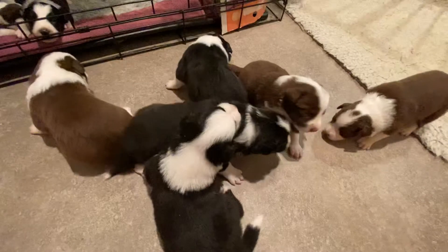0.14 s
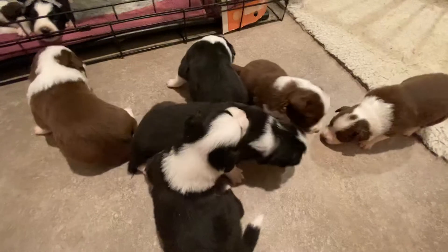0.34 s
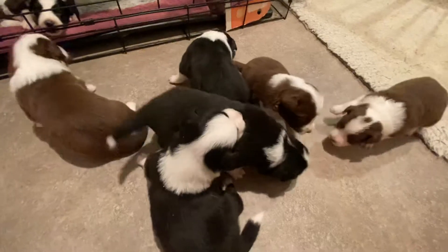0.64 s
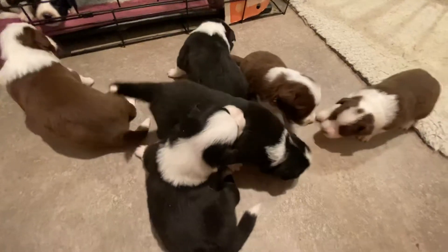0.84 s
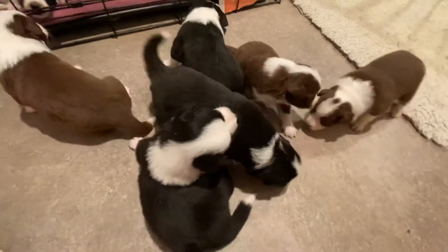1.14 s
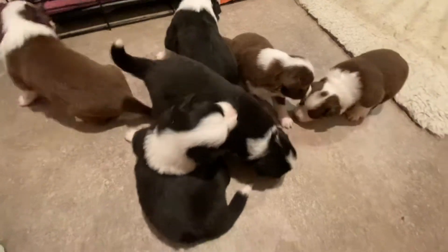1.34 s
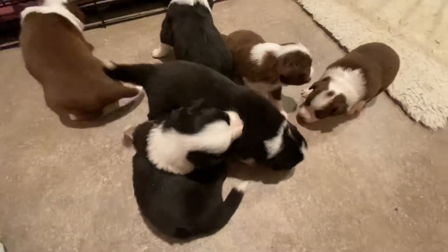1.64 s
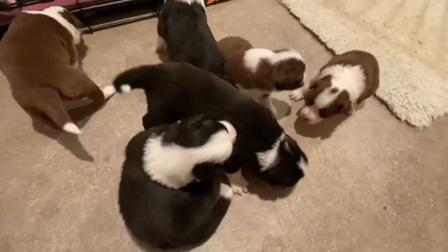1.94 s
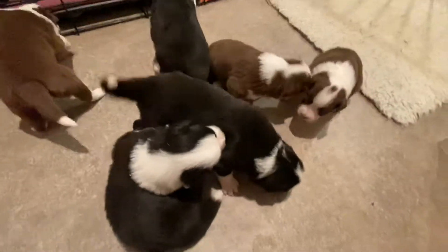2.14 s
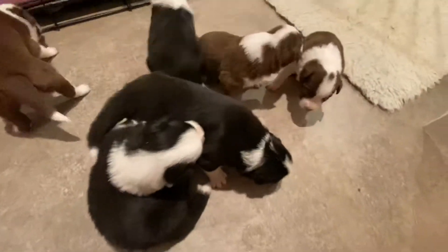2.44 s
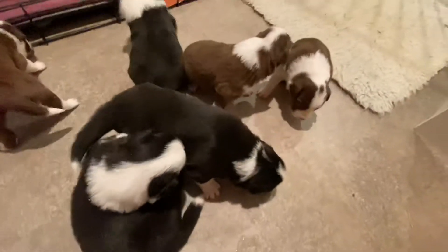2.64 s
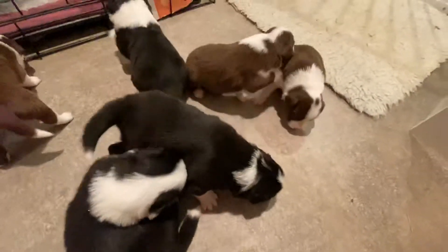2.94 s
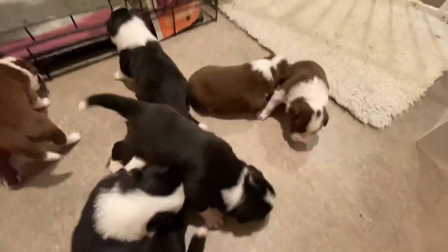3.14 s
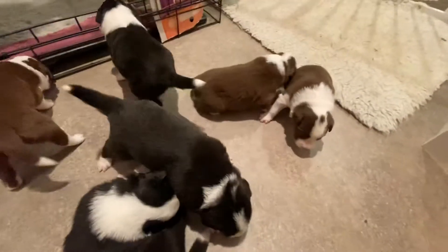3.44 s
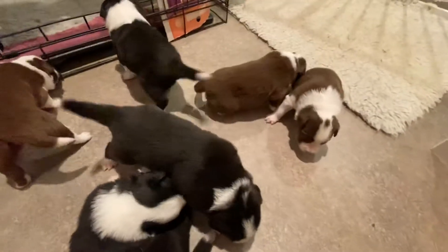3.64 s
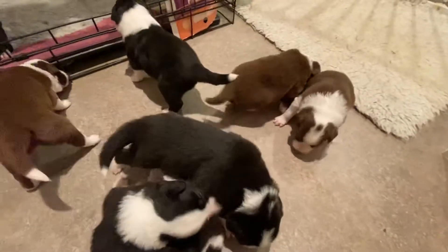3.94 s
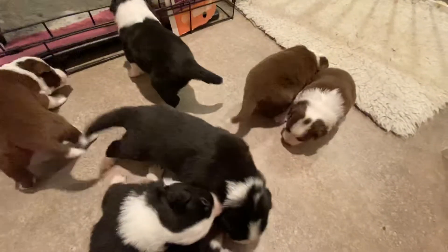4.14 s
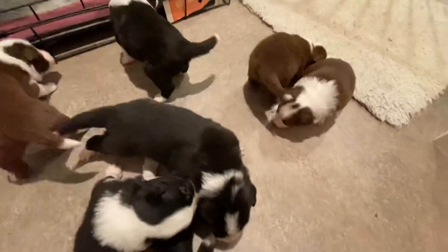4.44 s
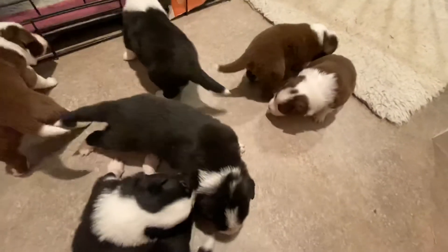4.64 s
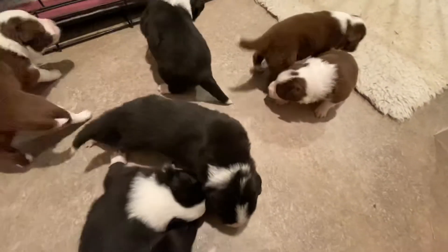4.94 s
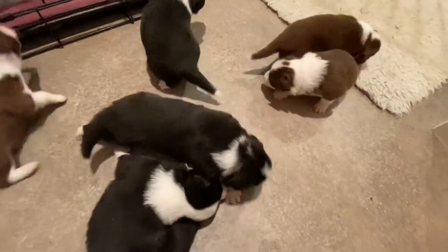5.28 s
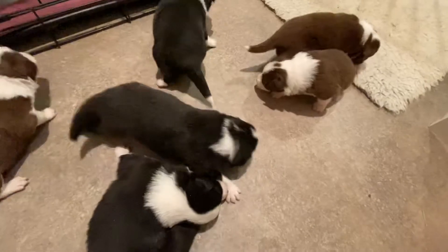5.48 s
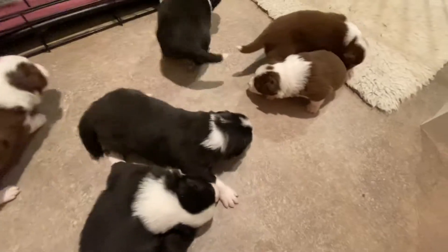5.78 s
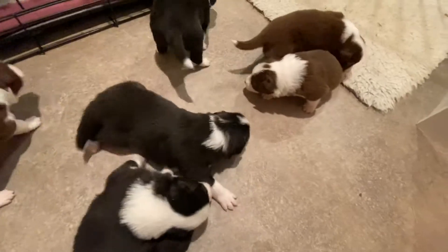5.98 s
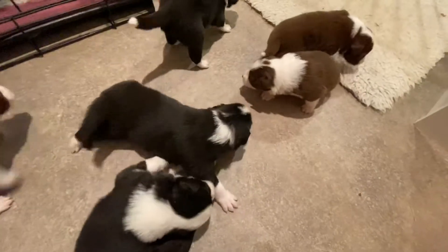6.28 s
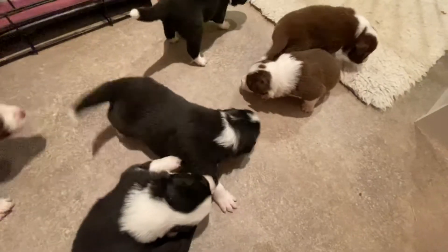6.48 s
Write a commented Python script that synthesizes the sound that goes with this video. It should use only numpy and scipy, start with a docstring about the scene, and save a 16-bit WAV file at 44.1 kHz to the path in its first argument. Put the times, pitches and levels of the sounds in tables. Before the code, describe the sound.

A handheld stereo microphone close to a litter of newborn-like puppies indoors. Padded paws bump and boom lightly, nails click, and coats brush in grainy rustles. Nasal little grunts pop up now and then, a thin whimper answers from the left after a second, then a quieter middle. The last stretch grows busier with whining, rough breath, quick grunts and two loud, piercing yelps, over short room reflections and faint rumble.

```python
"""Very young puppies scuffle on a carpet in a small room, close to a handheld stereo microphone.
From the start paws thud and pat on a booming floor, claws tick and fur brushes over the pile as grainy noise.
The near ones soon grunt: jittery pulses of the vocal folds ring throat, nose and mouth. After a second
one farther to the left whimpers thinly, and again near the end with hoarse breath along the late whimpers.
Two yelps break into shrieks last. Room echo, a low rumble and faint hiss lie under it all."""
import sys
import numpy as np
from scipy import signal
from scipy.fft import rfft, irfft
from scipy.io import wavfile
from scipy.ndimage import uniform_filter1d

SR = 44100
rng = np.random.default_rng(int(sys.argv[2]) if len(sys.argv) > 2 else 0)


def master(y):
    """Save y as 16-bit WAV."""
    cut = np.clip(np.atleast_2d(y).T, -1, 1)
    pcm = np.round(cut * 32767)  # scale
    wavfile.write(sys.argv[1], SR, pcm.astype(np.int16))


N = 291589  # length in samples
EDGE_HZ = 15900  # top of the recorder's band

# Paws landing with the body's weight and dragging on.
# Each row: time in seconds, thud peak in dB, drag level in dB before the scuffing is trimmed.
FOOTFALLS = [(.032, -49.5, -72), (.439, -45, -71), (.828, -49, -72), (.992, -46, -74), (1.276, -42, -67),
             (1.405, -49, -79), (1.555, -46.5, -66), (1.702, -41.5, -70), (1.802, -39, -79),
             (2.064, -46, -69), (2.328, -33.5, -77), (2.395, -39, -73), (2.717, -42.5, -73),
             (3.031, -34, -61), (3.338, -36, -80), (3.447, -47, -83), (3.551, -48, -85),
             (4.199, -46.5, -84), (4.39, -41, -79), (5.166, -45, -77), (5.239, -45, -67), (5.477, -45, -75),
             (5.734, -44, -62), (5.813, -40.5, -70), (6.322, -47, -61), (6.493, -34, -64)]
# Colour of a claw tick. Each row: frequency in Hz, gain in dB.
CLAW_COLOUR = [(400, -8), (1500, -12), (3500, -3.5), (7000, -6), (11000, 0.5), (15500, -8)]
# The litter's steady rustling, the base for rubbing and small ticks. Each row: time in seconds, level in dB.
RUSTLING = [(0.0, -83), (0.4, -77), (0.61, -88), (1.16, -76), (1.42, -82), (2.03, -75), (2.61, -86),
            (2.85, -80), (3.68, -88), (4.2, -82), (4.97, -82), (5.13, -76), (6.31, -71), (6.61, -74)]


def gain_of(db):
    """Decibels to amplitude."""
    return 10 ** (np.asarray(db) / 20)


def evened(x):
    """Scales to an rms of 1."""
    return x / np.sqrt(np.mean(x ** 2) + 1e-20)


def read(points, hz):
    """Reads a table on a log-frequency axis."""
    f, value = np.transpose(points)
    return np.interp(np.log(hz + 1), np.log(f + 1), value)


def bins(x):
    """The frequencies of the spectrum of x."""
    return np.fft.rfftfreq(x.shape[-1], 1 / SR)


def colour(x, db):
    """Filters x by a gain for each frequency."""
    return irfft(rfft(x) * gain_of(db), x.shape[-1])


def shelf(hz, corner_hz):
    """Rises smoothly from 0 to 1 around the corner."""
    return 1 - 1 / (1 + (hz / corner_hz) ** 6)


def resonance(hz, centre_hz, width_hz):
    """A bell of height 1 around the centre."""
    return 1 / (1 + ((hz - centre_hz) / width_hz) ** 2)


def wander(count, rate_hz):
    """Slow random drift of rms about 1: noise cut off above twice the rate."""
    x = rng.standard_normal(count + SR // 2)
    return evened(colour(x, -100 * shelf(bins(x), 2 * rate_hz)))[:count]


def panned(x, pan_db):
    """Leans a sound to the left (positive) or right."""
    return x * gain_of(np.array([[pan_db], [-pan_db]]) / 2)


def add(mix, s, sound):
    """Mixes a sound in at time s."""
    part = mix[:, max(round(s * SR), 0):][:, :sound.shape[-1]]
    part += sound[..., :part.shape[1]]


def noise_pair(count, envelope=1):
    """Noise for left and right, alike in the bass and mostly unrelated in the treble."""
    # Each row: frequency in Hz, left-right correlation.
    likeness = [(60, 0.93), (150, 0.34), (300, 0.75), (700, 0.26), (2000, 0.085), (5000, .1), (8500, 0.38),
                (13000, 0.25)]
    a, b = rfft(rng.standard_normal((2, count)) * envelope)
    same = np.clip(read(likeness, np.fft.rfftfreq(count, 1 / SR)), -1, 1)
    return irfft(np.array([a, same * a + np.sqrt(1 - same ** 2) * b]), count)


def grunt(start, attack, hold, release, db, swell_db, top_hz, crest, rough):
    """Effort swells, holds and lets go; the slack folds then drop in pitch and rattle."""
    rise_hz_per_s, sag_hz_per_s, droop_db_per_s = 1100, 700, 85  # it sags as the air is spent
    release_db = -20  # how far it fades over its release
    slack_s, slack_drop, slack_rough = .018, .22, .6  # how fast, share of pitch lost, roughness gained
    t = np.linspace(0, attack + hold + release, num=200)
    slack = 1 - np.exp(-np.maximum(t - attack - hold, 0) / slack_s)
    pushed = np.minimum(t, attack + hold)
    pitch = top_hz - np.maximum(rise_hz_per_s * (crest - pushed), sag_hz_per_s * (pushed - crest))
    droop_db = -droop_db_per_s * hold
    corners = np.cumsum([0, attack, hold, release])
    level = db + np.interp(t, corners, [-swell_db, 0, droop_db, droop_db + release_db])
    return start + t, pitch * (1 - slack_drop * slack), level, rough + slack_rough * slack


def yelp(start, break_s, length, first_hz, db, rough):
    """A rising cry breaks upward into a shriek, loudest at the top pitch; gives the two parts."""
    glide_hz_per_s, leap_hz, leap_s = 2500, 175, .004  # glide up, then break into a higher register
    crest_s, fall_hz_per_s, db_per_hz = .057, 4500, .055
    t = np.arange(0, length, .0005)
    broken = .5 + .5 * np.tanh((t - break_s - leap_s) / leap_s)
    pitch = first_hz + glide_hz_per_s * np.minimum(t, crest_s) + leap_hz * broken
    pitch -= fall_hz_per_s * np.maximum(t - crest_s, 0)
    level = db - db_per_hz * (pitch.max() - pitch)
    course = np.array([start + t, pitch, level, rough + 0 * t])
    return course[:, t < break_s], course[:, t >= break_s]


def whimper(start, length, crest, top_hz, fall_hz, db, rough):
    """A thin tone fades in, arches over its top and falls away, wavering."""
    attack_s, onset_db, waver, waver_hz = .016, -12, .012, 40  # waver is a share of the pitch
    t = np.arange(0, length, 1 / SR)
    arch = top_hz - fall_hz * ((t - crest) / (length - crest)) ** 2
    pitch = arch * (1 + waver * wander(len(t), waver_hz))
    level = db + onset_db * np.maximum(1 - t / attack_s, 0)
    return start + t, pitch, level, rough + 0 * t


def vocal_folds(turns, top_hz, rough, spread=.55, shimmer=.76, uneven=.35):
    """Pulses summed from harmonics; strained folds beat unevenly, strong and weak in turn."""
    # the partials lag one another, so each pulse is spread over its cycle
    partials = range(1, int(EDGE_HZ / top_hz))
    folds = evened(sum(np.cos(2 * np.pi * k * turns - spread * k * k) for k in partials))
    return folds * (1 + rough * (shimmer * wander(len(turns), 213) + uneven * np.cos(np.pi * turns)))


def call(voice, course, mouth_db=9, mouth_width_hz=130, upper_width_hz=220, jitter=.0075, rough_jitter=.0792,
         air_db=-11, hiss_db=-1, hiss_bass_db=-28, fade_db=-14, airy_hz=2200, attack=.0042, release=.01,
         lowest_hz=170):
    """Jittery pulses of the vocal folds, with a puff of air each cycle, ring the throat, nose and mouth."""
    # A puppy's head and throat. Each row: frequency in Hz, gain in dB.
    throat = [(120, -31.5), (210, -18.5), (280, 1), (420, -5.5), (600, -6.5), (1000, -9), (1230, -19),
              (1680, -18), (2100, -23.5), (2450, -23), (3000, -39.5), (5200, -45.5), (6500, -32.5),
              (8800, -50.5), (10700, -37.5), (15000, -62)]
    # Little in the bass. Each row: frequency in Hz, share of the widening.
    widening_share = [(380, 0.054), (620, 0.8), (850, 0.77), (1200, 0.53), (2000, 0.24)]
    lead_ms, pan_db, mouth_hz, nasal_db, upper_hz, upper_db = voice
    s, *controls = course
    t = np.arange(s[0] - .02, s[-1] + .02, 1 / SR)
    pitch, level, rough = (np.interp(t, s, control) for control in controls)
    pitch = pitch * (1 + (jitter + rough_jitter * rough) * wander(len(t), 138))
    turns = np.cumsum(pitch) / SR
    folds = vocal_folds(turns, pitch.max(), rough)
    puffs = evened((0.53 + np.exp(-(turns % 1) / 0.27)) * rng.standard_normal(len(t)))
    # air takes over from the pulses in the treble
    hz = bins(t)
    airy = shelf(hz, airy_hz)
    voiced = folds + gain_of(air_db) * np.sqrt(abs(rough)) * puffs
    drive = colour(voiced, fade_db * airy) + colour(puffs, hiss_bass_db * (1 - airy) + hiss_db * airy)
    throat_db = read(throat, hz) + nasal_db * (1 - shelf(hz, 530))
    throat_db += mouth_db * resonance(hz, mouth_hz, mouth_width_hz)
    throat_db += upper_db * resonance(hz, upper_hz, upper_width_hz)
    x = colour(drive, throat_db)
    # loudness follows the effort, whichever partial the mouth favours
    window = signal.windows.hann(701)
    x /= np.sqrt(abs(signal.fftconvolve(x ** 2, window / window.sum(), "same")) + 1e-12)
    gate = np.clip(np.minimum((t - s[0]) / attack, (s[-1] - t) / release) + .5, 0, 1)
    x *= gain_of(level) * np.sin(np.pi / 2 * gate) ** 2
    radiated = rfft(x) * shelf(hz, lowest_hz)  # the voice keeps no bass
    # the recorder's stereo widening turns left and right apart, little in the bass
    turn = np.exp(1j * np.pi * hz * lead_ms / 1000 * read(widening_share, hz))
    return t[0], panned(irfft(radiated * np.array([turn, 1 / turn]), len(t)), pan_db)


def near_voices():
    """Grunts and yelps close to the microphone, each driven by its own effort."""
    # Grunts. Each row holds the effort: start, attack, hold and release in seconds, level in dB, swell in dB,
    # top pitch in Hz, time to the top in seconds, roughness; then the voice: left lead in ms before
    # the widening share, left-right in dB, mouth resonance in Hz, nasal gain in dB,
    # upper resonance in Hz, its gain in dB.
    grunt_rows = [ ((.277, .003, .02, .06, -51, 0, 315, 0, .6), (-1, -1, 800, 1, 1500, -12)),
                  ((1.33, .005, .011, .02, -37, 2, 410, 0, .36), (1.3, 1, 683, 10, 1698, -3)),
                  ((1.832, .048, .011, .02, -27.5, 5, 428, .059, .07), (.3, -1.5, 775, 2, 1760, 5)),
                  ((2.654, .014, .014, .025, -37.5, 8, 297, .014, .25), (0, 3.5, 783, 7, 1398, 5)),
                  ((2.892, .04, .072, .09, -28.3, 9, 415, .04, .13), (.1, -2, 780, 4, 1650, 0)),
                  ((4.082, .018, .006, .025, -34.5, 12, 312, .02, .15), (.1, 2, 830, 4.5, 1272, 12)),
                  ((4.322, .07, .004, .036, -35.5, 2, 329, .024, .26), (.2, 0, 880, 4, 1400, 14)),
                  ((4.54, .012, .01, .035, -56, 6, 318, 0, .9), (3, 4.5, 850, 17, 1497, 6.5)),
                  ((4.974, .004, .018, .035, -47.5, 2, 315, 0, .5), (1.5, 2, 850, 17.5, 1500, -14)),
                  ((5.17, .016, .008, .022, -37.5, 9, 311, .014, .3), (.3, .5, 930, 13, 1200, 3)),
                  ((5.376, .016, .012, .03, -38.5, 4, 310, 0, .5), (1.5, .5, 874, 13, 1403, 6)),
                  ((5.577, .017, .018, .025, -40.5, 9, 316, .012, 1.1), (.8, 1.5, 902, 7, 1300, 11)),
                  ((5.635, .03, .06, .04, -50, 2, 335, .02, .8), (1, 2, 850, 18, 1500, 0)),
                  ((5.778, .016, .012, .07, -34.5, 12, 385, .03, .9), (1, 4, 764, .5, 1600, 2)),
                  ((6.128, .053, .014, .04, -31, 18, 305, .068, .3), (.26, 2.5, 824, 1, 1411, 4)),
                  ((6.307, .038, .005, .025, -32.5, 5, 368, .04, .5), (1.15, 2.5, 730, -6, 1400, 2)),
                  ((6.355, .015, .015, .04, -36.5, 3, 422, .025, .3), (1.15, 2.5, 716, 12, 1152, 0)),
                  ((6.454, .02, .024, .02, -39.5, 5, 412, .02, 1.3), (.5, 1.5, 824, 1.5, 1402, 3))]
    # Yelps. Each row: start, time to the break and length in seconds, first pitch in Hz,
    # shriek level in dB, roughness.
    yelp_rows = [(6.009, .025, .09, 610, -19.5, .33), (6.568, .018, .06, 665, -23, .4)]
    # Voices before and after the break: columns as for a grunt's voice.
    cry_voice = (-.4, 0, 1270, -18, 1850, 9)
    shriek_voice = (.45, -.5, 876, -19, 1776, 4.5)
    near = np.zeros((2, N))
    for effort, voice in grunt_rows:
        add(near, *call(voice, grunt(*effort)))
    for row in yelp_rows:
        cry, shriek = yelp(*row)
        add(near, *call(cry_voice, cry))
        add(near, *call(shriek_voice, shriek))
    return near


def far_voice():
    """Thin whimpers of the puppy farther to the left."""
    # Its voice: left lead in ms before the widening share, left-right in dB, mouth resonance in Hz,
    # nasal gain in dB, upper resonance in Hz, its gain in dB.
    whimper_voice = (0.5, 4, 827, 0, 1450, -9)
    # Each row: start, length and time to the top in seconds, top pitch in Hz, fall in Hz,
    # level in dB, roughness.
    whimper_rows = [(1.263, .08, 0, 900, 70, -42.5, .07), (1.31, .024, 0, 665, 110, -39.5, .1),
                    (1.355, .088, 0, 750, 80, -49, .1), (4.708, .056, .004, 865, 290, -47, .05),
                    (4.855, .068, .022, 765, 145, -51.5, .05), (5.108, .058, .022, 845, 180, -55, .07),
                    (5.426, .03, 0, 770, 130, -44, .1), (5.456, .046, .022, 880, 80, -49.5, .2),
                    (5.498, .076, .024, 877, 135, -46, .2), (5.585, .075, .025, 915, 70, -50, .3),
                    (5.66, .105, .015, 880, 260, -50, .3), (5.757, .06, .025, 855, 70, -44, .3),
                    (5.875, .064, 0, 755, 110, -46, .3)]
    far = np.zeros((2, N))
    for row in whimper_rows:
        add(far, *call(whimper_voice, whimper(*row)))
    return far


def hoarse_breath():
    """Hoarse breath along the late whimpers: very rough folds under one long arch."""
    # Columns as for the whimpering voice.
    breath_voice = (0.5, -1, 809, 5, 2006, 19)
    # Columns as for a whimper.
    breath_course = (5.41, .53, .22, 865, 125, -56.5, 1.5)
    out = np.zeros((2, N))
    add(out, *call(breath_voice, whimper(*breath_course)))
    return out


def thud(s, db, rise=0.013, early=0.0085):
    """A soft push sets the floor booming, a little differently at each spot."""
    # The floor's boom before each spot's shift. Each row: frequency in Hz, level in dB, t60 in seconds.
    floor_modes = [(66.64, -4.5, .22), (84, 0, 0.18), (106.3, -6.5, 0.13), (154.4, -10, 0.12),
                   (194.2, -15, 0.13)]
    t = np.arange(SR // 2) / SR
    x = np.zeros(len(t))
    for hz, mode_db, t60 in floor_modes:
        decay = gain_of(mode_db + 2 * rng.standard_normal() - 60 * t / t60)
        x += decay * np.sin(2 * np.pi * hz * rng.uniform(0.948, 1.059) * t)
    x *= 1 - np.exp(-(t / rise) ** 2)
    return s - early, gain_of(db) * x / abs(x).max()


def burst(s, db, shape, decay, treble_db, corner_hz):
    """A brief contact: a puff of noise that dies at once, coloured by what was touched."""
    t = (np.arange(4096) - 256) / SR
    x = noise_pair(len(t), (t >= 0) * np.exp(-abs(t) / decay))
    x = colour(x, read(shape, bins(x)) + treble_db * shelf(bins(x), corner_hz))
    return s + t[0], gain_of(db) * x / abs(x).max()


def claw_tick(s, db, top_db):
    """A tick of noise that dies within a few milliseconds."""
    return burst(s, db, CLAW_COLOUR, decay=0.0021, treble_db=top_db, corner_hz=6630)


def steps(pat_db=1, pat_treble_db=9, tick_top_db=3):
    """Thuds, pats and claw ticks of the tumbling litter; the settings are added to the tables."""
    # Paws slapping the carpet. Each row: time in seconds, peak in dB, treble in dB (both before
    # the additions), left-right in dB.
    pats = [(0.276, -42, -21, -6), (0.39, -48, -15, 0), (0.581, -50.5, -11.5, -1),
            (1.073, -45, -11.5, -1.5), (1.56, -48.5, -16, 3.5), (1.693, -42, -42, 3), (2.033, -51, 6, 1),
            (2.075, -47, -35, 1.5), (2.119, -50, -3, 1), (2.308, -35, -30, 1.5), (3.348, -46.5, -39, 4.5),
            (5.23, -27.5, -16.5, 1.0)]
    # Colour of a pat. Each row: frequency in Hz, gain in dB.
    pat_colour = [(100, -13.5), (200, -7.5), (290, 6.5), (450, -8.5), (750, -6), (1200, -9), (2500, -16.5),
                  (6000, -37.5), (15000, -48.5)]
    # The sharpest claw catches and wet mouth clicks. Each row: time in seconds, peak in dB,
    # top octave in dB before the addition.
    ticks = [(0.112, -44.5, -13), (0.3235, -45.5, -39), (.9625, -48, -12), (1.336, -40, 16),
             (1.5623, -40.5, -30), (1.6837, -43.5, -12), (1.8, -43, -22), (1.943, -38, -11.5),
             (2.2215, -46, -8), (3.04, -38.5, -2), (3.3125, -49.5, -45), (3.929, -46.5, 1),
             (4.3013, -41.5, 2.5), (4.7057, -42, 1), (5.4806, -42, -27), (5.5174, -42, -22),
             (5.6927, -44.5, 1), (5.8676, -40, -14), (6.317, -40.5, -20)]
    out = np.zeros((2, N))
    for s, db, _ in FOOTFALLS:
        add(out, *thud(s, db))
    for s, db, treble_db, pan_db in pats:
        start, x = burst(s, db + pat_db, pat_colour, decay=.011,
                         treble_db=treble_db + pat_treble_db, corner_hz=980)
        add(out, start, panned(x, pan_db))
    for s, db, top_db in ticks:
        add(out, *claw_tick(s, db, top_db + tick_top_db))
    return out


def small_ticks(count=30, above_db=17, spread_db=4, top_db=-6):
    """Faint claw ticks at random moments, their peaks scattered at a height above the rustling."""
    out = np.zeros((2, N))
    for when, size in rng.random((count, 2)):
        s = when * N / SR
        db = np.interp(s, *np.transpose(RUSTLING)) + above_db + spread_db * (2 * size - 1)
        add(out, *claw_tick(s, db, top_db))
    return out


def rub(strength, shape, clump_db, grain_db, patchy_db=4):
    """Fibres catch and let go in clumps: grainy noise whose colour shifts from spot to spot."""
    grains = evened(gain_of(clump_db * wander(N, 70) + grain_db * wander(N, 1100)))
    hz, _, z = signal.stft(noise_pair(N, grains), SR, nperseg=256)
    # patches of louder and softer bands, smoothed over frequency and time
    patches = uniform_filter1d(rng.standard_normal(z.shape[1:]), size=6, axis=0)
    patches = evened(uniform_filter1d(patches, size=16, axis=1))
    x = signal.istft(z * gain_of(read(shape, hz)[:, None] + patchy_db * patches), SR, nperseg=256)[1]
    return strength * evened(x[:, :N])


def rubbing(scuff_db=3, steady_scuff_db=-9, steady_fur_db=-5.5, restless_db=3.5, restless_hz=11):
    """Paws drag over the pile after each step and coats slide on each other, over a restless rustle."""
    # One body sliding along another. Each row: middle in seconds, half length in seconds,
    # scuffing in dB before its trim, fur brushing in dB.
    brushes = [(.127, .014, -72, -72), (.31, .03, -72, -76), (.39, .03, -69.5, -67),
               (.495, .03, -66.5, -59.5), (.835, .024, -76, -67), (.969, .014, -68, -72.5),
               (1.31, .03, -74, -62), (1.626, .017, -61.5, -65.5), (2.187, .036, -66, -74),
               (2.424, .032, -67, -75), (2.76, .035, -71, -73), (2.912, .014, -65, -85),
               (1.958, .049, -76, -71.5), (3.916, .045, -77.5, -79), (5.02, .05, -74, -72),
               (4.317, .011, -62, -58), (4.38, .06, -72, -71), (4.589, .016, -69.5, -62),
               (4.649, .013, -74, -63.5), (5.238, .015, -76, -61), (5.74, .04, -68, -60),
               (6.185, .055, -69.5, -67)]
    # Colours of scuffing and of fur. Each row: frequency in Hz, gain in dB.
    scuff_colour = [(150, -17), (320, 2), (600, -8.5), (1100, -1), (2000, 6.5), (3000, 4.5), (5000, -0.5),
                    (8000, -7.5), (15000, -23.5)]
    fur_colour = [(2500, -29), (5000, -4.5), (7000, 1.5), (8500, 0.5), (9300, -9), (10700, 9), (12000, 6),
                  (13300, -10.5), (14500, 6.5), (16000, -24.5)]
    drag_delay_s, drag_half_s = .008, .022
    t = np.arange(N) / SR
    drags = [(s + drag_delay_s, drag_half_s, db, db) for s, _, db in FOOTFALLS]
    s, length, *levels = np.transpose(brushes + drags)
    coarse = t[::44]  # about a millisecond apart
    power = np.exp(-((coarse[:, None] - s) / length) ** 2) @ gain_of(levels).T ** 2
    scuff, fur = (np.interp(t, coarse, np.sqrt(p)) for p in power.T)
    steady_db = np.interp(t, *np.transpose(RUSTLING)) + restless_db * wander(N, restless_hz)
    scuff = np.hypot(scuff * gain_of(scuff_db), gain_of(steady_db + steady_scuff_db))
    fur = np.hypot(fur, gain_of(steady_db + steady_fur_db))
    return (rub(scuff, scuff_colour, clump_db=2, grain_db=2.5)
            + rub(fur, fur_colour, clump_db=2.5, grain_db=1.5))


def room(x, first=0.0056):
    """Dense reflections from walls and furniture, each band dying at its own speed."""
    # Each row: frequency in Hz, t60 in seconds.
    dying_times = [(100, 0.3), (280, 0.45), (700, 0.26), (1800, 0.29), (5000, 0.24), (14000, 0.12)]
    hz, t, z = signal.stft(noise_pair(SR // 2), SR, nperseg=256)
    tail = signal.istft(z * gain_of(-60 * t / read(dying_times, hz)[:, None]), SR, nperseg=256)[1]
    # silent until the first reflection, full after twice that time
    tail *= np.clip(np.arange(tail.shape[1]) / SR / first - 1, 0, 1)
    return signal.fftconvolve(x, tail / np.linalg.norm(tail[0]), axes=1)[:, :N]


def background(air_level_db=-73.5):
    """Low rumble from the floor as bodies shift, under the faint hiss of the room."""
    # Rumble of shifting bodies. Each row: time in seconds, level in dB.
    rumble_course = [(0.0, -66.5), (3.57, -60), (3.87, -73.5), (6.61, -51)]
    # Colours of the rumble and of the room's hiss. Each row: frequency in Hz, relative level in dB.
    rumble_colour = [(15, -29), (30, -13.5), (50, -5.5), (75, -5.5), (105, -2.5), (140, -16), (300, -23.5),
                     (1000, -52)]
    air_colour = [(59, -26), (100, 0.5), (156, -21.5), (347, -7), (487, -16), (6660, -32.5), (9340, -37),
                  (11100, -28.5), (13100, -46), (15500, -40)]
    t = np.arange(N) / SR
    rumble = evened(colour(noise_pair(N), read(rumble_colour, bins(t))))
    air = evened(colour(noise_pair(N), read(air_colour, bins(t))))
    return gain_of(np.interp(t, *np.transpose(rumble_course))) * rumble + gain_of(air_level_db) * air


def scene(near_room_db=-14.5, far_room_db=-10, steps_room_db=-10):
    """Near and far voices and the scuffle share one room."""
    near, far, breath = near_voices(), far_voice(), hoarse_breath()
    feet = steps() + small_ticks() + rubbing()
    # the breath excites the room as little as the near voices do
    into_room = gain_of(near_room_db) * (near + breath) + gain_of(far_room_db) * far
    into_room += gain_of(steps_room_db) * feet
    return near + far + breath + feet + room(into_room) + background()


def record(dry):
    """The recorder's band limit."""
    low_pass = signal.firwin(511, EDGE_HZ, window=("kaiser", 9), fs=SR)
    return signal.oaconvolve(dry, low_pass[None], "same")


dry = scene()
out = record(dry)
master(out)
```